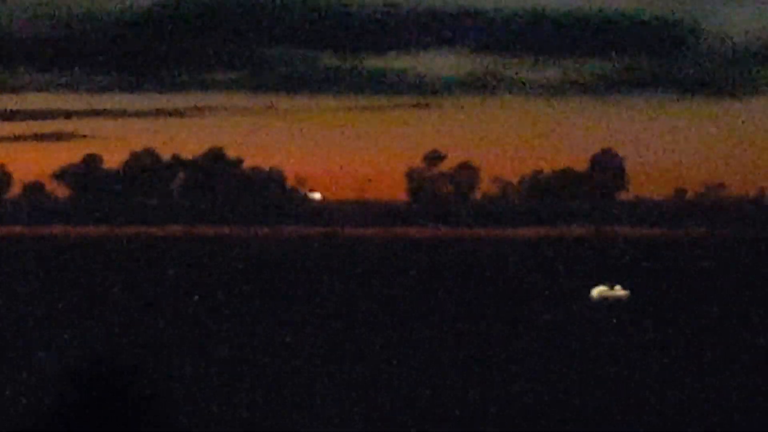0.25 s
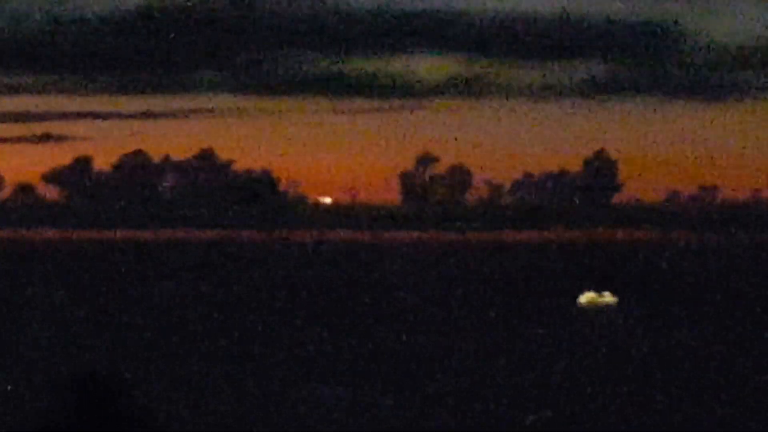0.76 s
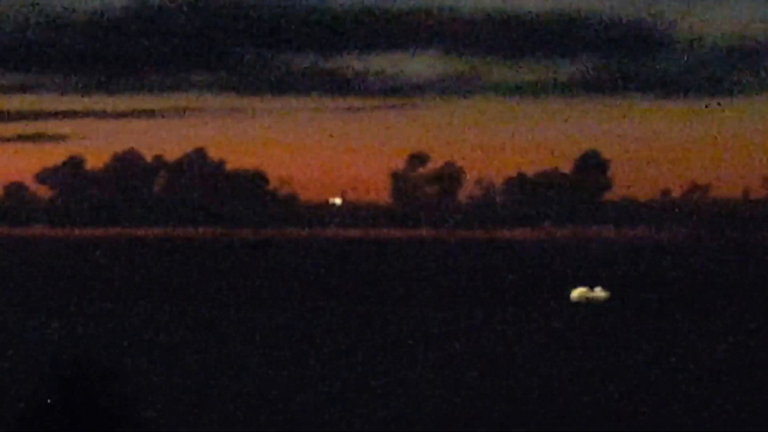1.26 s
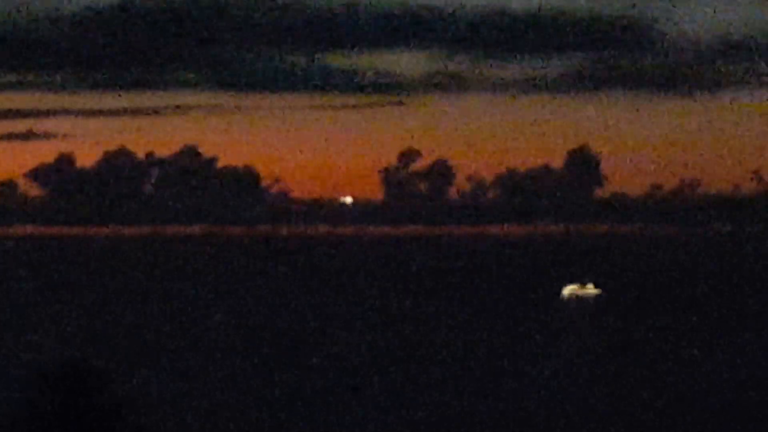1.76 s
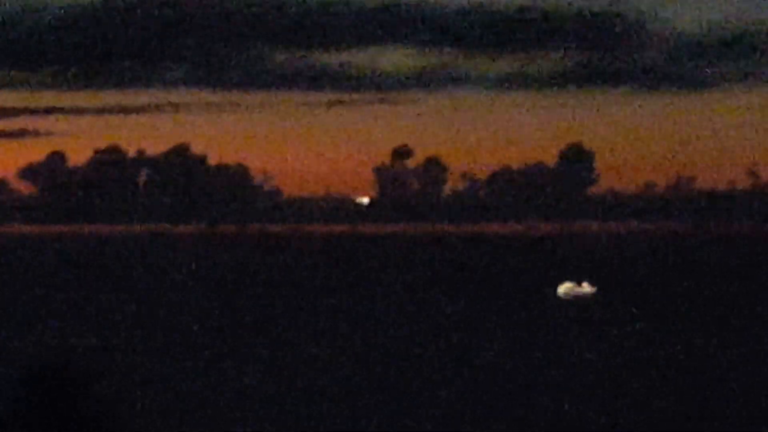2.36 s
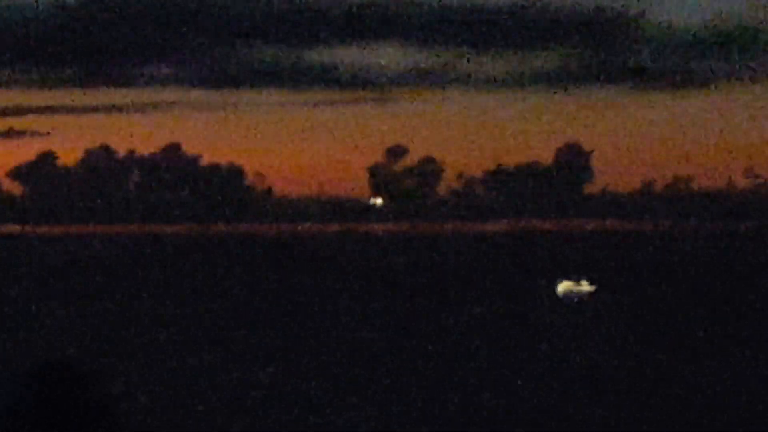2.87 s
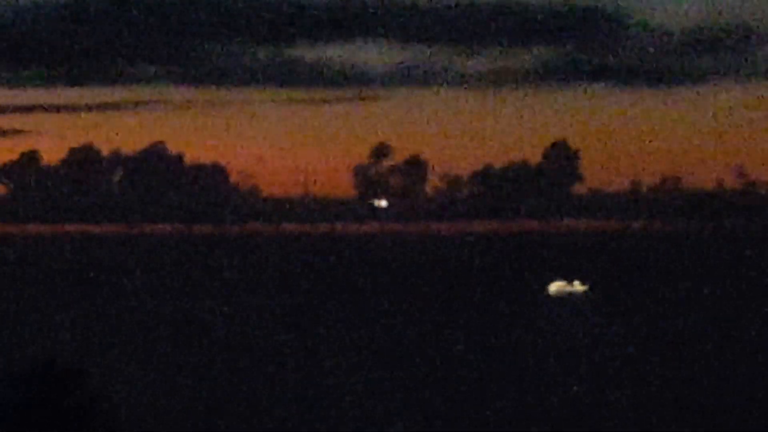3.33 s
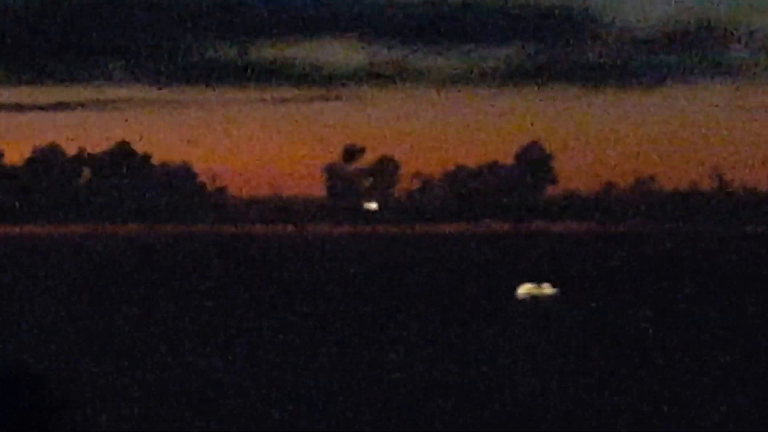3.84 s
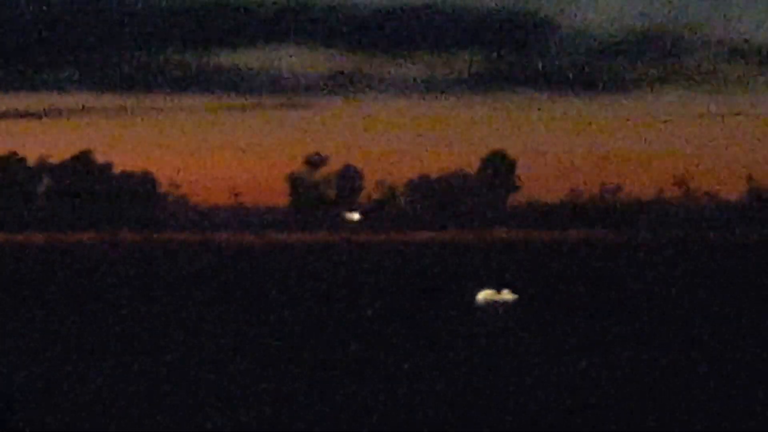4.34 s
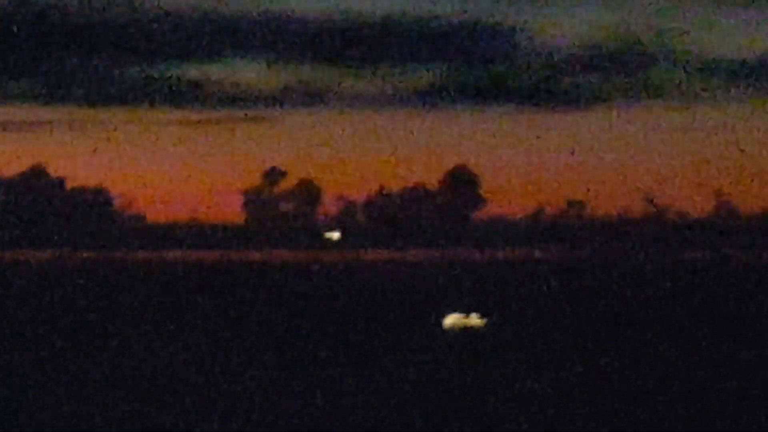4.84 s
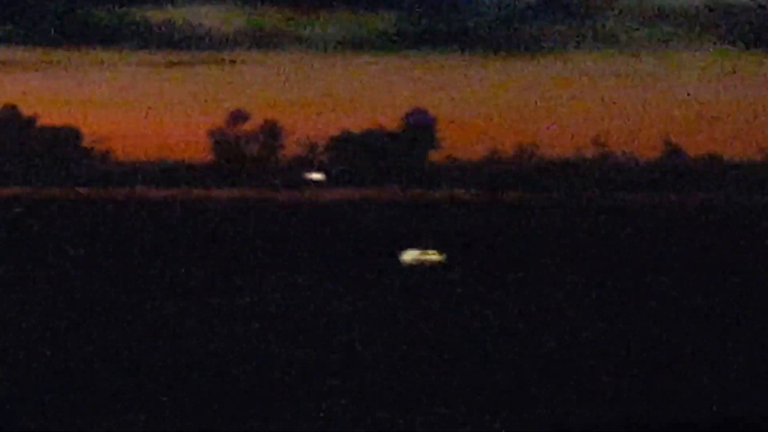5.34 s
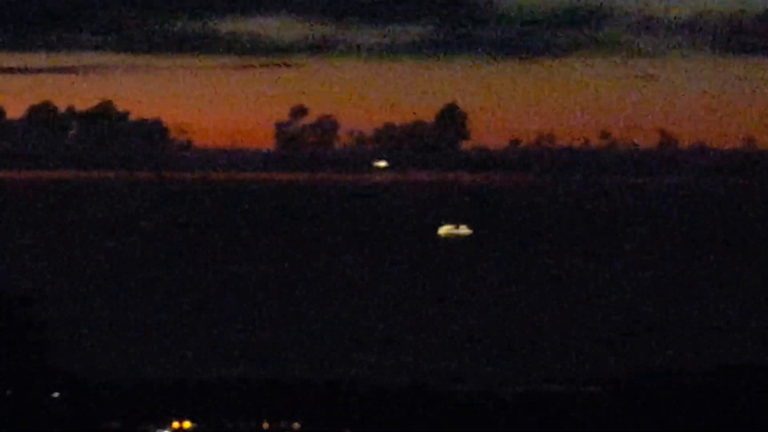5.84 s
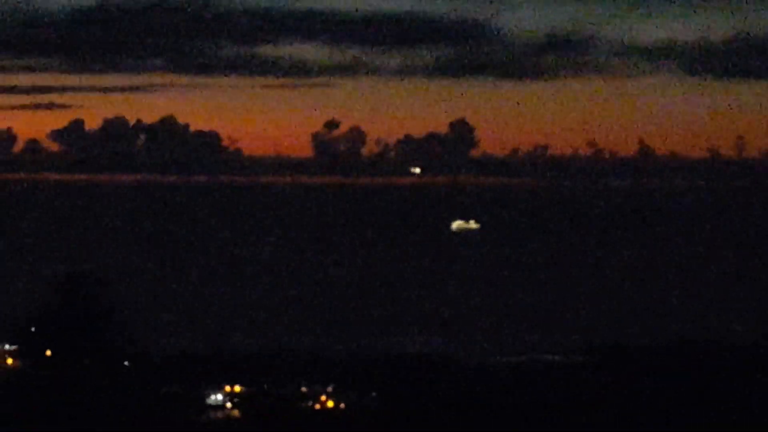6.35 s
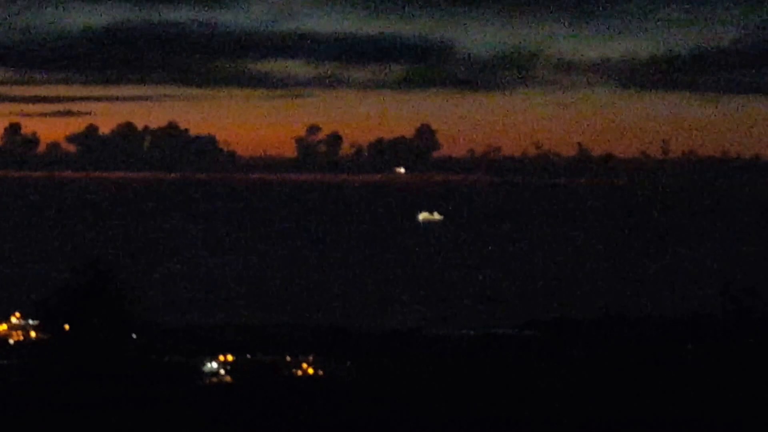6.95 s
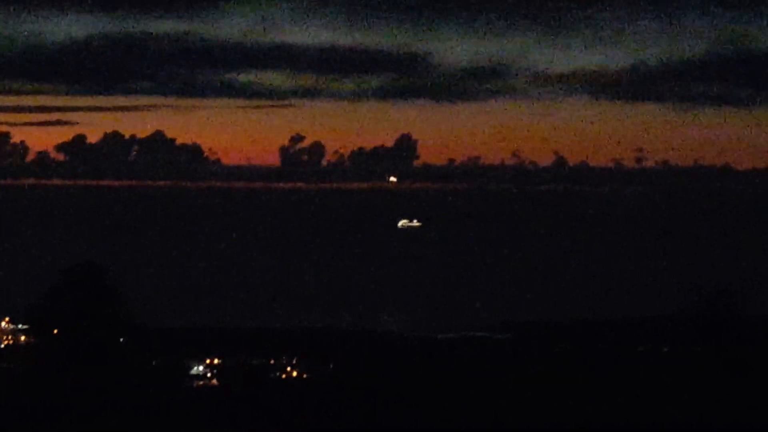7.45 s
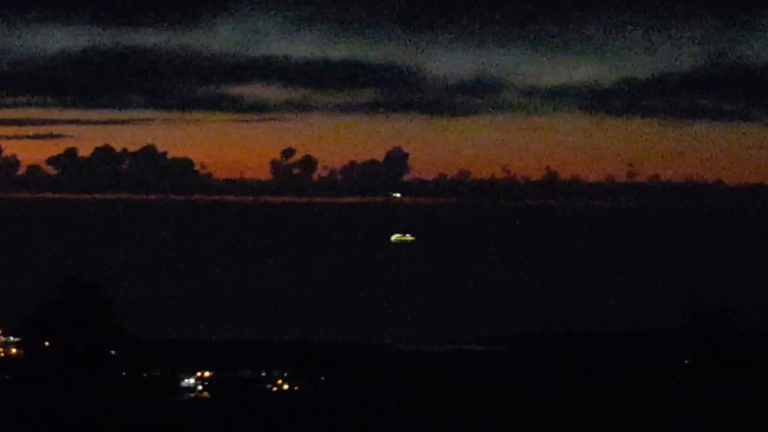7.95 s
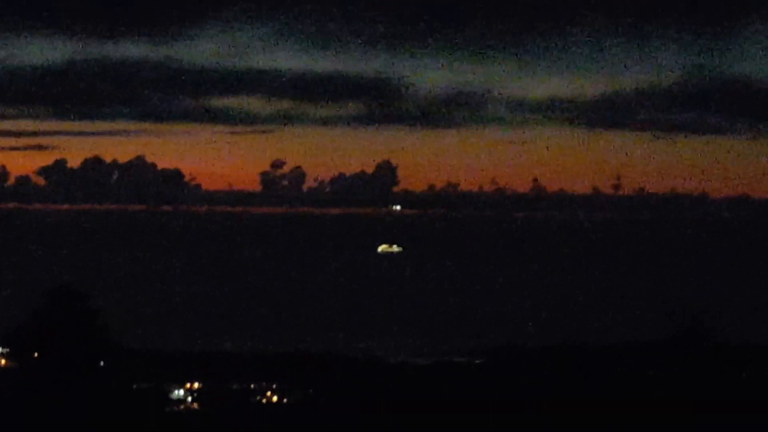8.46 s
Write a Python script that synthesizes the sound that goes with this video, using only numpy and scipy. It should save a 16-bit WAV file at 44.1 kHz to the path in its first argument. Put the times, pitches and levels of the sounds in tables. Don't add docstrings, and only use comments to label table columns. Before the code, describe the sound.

A close high frog chirp opens the scene, followed by loose rounds of low and rising notes roughly every two to three seconds. Fainter calls scatter through leafy surroundings with short garden echoes. A steady high insect whine and soft hiss continue throughout, over distant engine hum. A handheld stereo camera catches skin rubs early, a sharper bump in the middle and light taps later.

```python
import sys
import numpy as np
from scipy import signal
from scipy.io import wavfile
from scipy.ndimage import uniform_filter1d

SR = 44100
rng = np.random.default_rng(int(sys.argv[2]) if len(sys.argv) > 2 else 0)


def persist_wave(psi):
    counts = np.round(np.clip(psi, -1, 1) * 32767).astype(np.int16)
    wavfile.write(sys.argv[1], SR, np.atleast_2d(counts).T)


def voltage_ratio(decibels):
    exponent = np.asarray(decibels, float) / 20
    return 10 ** exponent


N = 383669

# pitch_hz, length_s, octave_db, left_right_db, droop_share
LOW_VOICES = [(1543, 0.11, -33, 8.5, 0.016), (1520, 0.11, -10, 1, -0.005), (1589, 0.097, -20.5, 5, 0.015)]
# start_hz, goal_hz, glide_s, left_right_db
HIGH_VOICES = [(2383, 2770, 0.063, 4), (2450, 2815, .028, 2), (2460, 2840, .042, 4.5)]
# start_s, level_db
LOW_CALLS = [
    [(.733, -36), (3.596, -35), (5.846, -38), (8.041, -35)],
    [(2.606, -40), (4.83, -37), (7.277, -37.5)],
    [(2.7, -44.5), (5.39, -43), (6.697, -43.5)],
]
# start_s, level_db, length_s, peak_after_s
HIGH_CALLS = [
    [(1.034, -31.5, 0.099, 0.066), (3.876, -31.5, 0.11, 0.064), (6.121, -38.5, 0.13, 0.08),
     (8.306, -40.5, 0.13, 0.075)],
    [(.067, -26.5, .11, 0.072), (2.84, -30, 0.11, 0.066), (5.078, -27, 0.099, 0.071),
     (7.534, -27.5, 0.11, 0.072)],
    [(.129, -34.5, 0.094, 0.043), (2.967, -40, 0.13, 0.049), (5.667, -42, 0.104, 0.049),
     (6.948, -33, 0.12, 0.056)],
]
# start_hz, goal_hz, glide_s, left_right_db
HOOK_VOICE = (1560, 1712, 0.028, 9.2)
# start_s, level_db, length_s
HOOK_CALLS = [
    (2.874, -47.5, 0.11),
    (5.067, -41, 0.12),
    (7.482, -39.5, .125),
]
# start_s, length_s, pitch_hz, level_db
BUSH_LOW_CALLS = [(0.244, 0.11, 1484, -54), (0.416, 0.037, 1560, -63), (.825, .09, 1830, -50.5),
                  (1.181, 0.094, 1508, -58), (1.297, 0.084, 1460, -57.5), (1.616, 0.074, 1630, -55.5),
                  (1.767, 0.12, 1500, -58), (1.863, 0.071, 1422, -51.5), (2.308, 0.13, 1600, -58),
                  (2.585, 0.16, 1578, -45.5), (3.043, 0.069, 1480, -51), (3.93, 0.097, 1500, -62),
                  (4.338, 0.078, 1628, -55), (4.332, 0.083, 1444, -57), (4.55, 0.11, 1523, -57.5),
                  (5.024, 0.042, 1395, -58.5), (5.323, 0.24, 1462, -62), (5.993, 0.054, 1620, -55),
                  (6.21, 0.067, 1464, -52), (6.226, 0.12, 1564, -55), (6.32, 0.14, 1492, -61),
                  (6.508, 0.083, 1408, -52), (7.238, .09, 1620, -51), (8.375, 0.14, 1469, -54.5),
                  (8.584, 0.091, 1565, -62)]
# start_s, goal_hz, glide_s, level_db, left_right_db
BUSH_HIGH_CALLS = [(.2, 2900, 0.053, -50, 8), (.496, 2734, 0.034, -47, 1), (.534, 2747, 0.044, -55, 1),
                   (.6, 2820, 0.048, -63, 3), (1.0, 2937, 0.066, -50, 0), (1.254, 2320, 0.028, -57.5, 6),
                   (1.425, 2900, 0.06, -54.5, 6), (1.443, 2690, 0.05, -54, 3),
                   (1.874, 3086, 0.064, -45.5, 7), (2.016, 2933, 0.071, -50, 9),
                   (2.382, 2956, 0.065, -52, -1), (2.572, 2965, 0.053, -51, 8),
                   (2.607, 2850, 0.058, -54, 0), (2.76, 2727, 0.051, -47.5, -2),
                   (3.238, 2870, 0.03, -49, 5), (3.294, 2900, 0.083, -46.5, -2), (3.8, 2950, 0.062, -55, 3),
                   (4.127, 2790, 0.081, -58, 1), (4.6, 3210, 0.1, -47, 7), (4.819, 2887, .05, -49.5, 11),
                   (5.0, 2850, 0.064, -63, 8), (5.234, 2310, 0.0282, -54.5, 8),
                   (5.335, 2950, 0.037, -57, 9), (5.591, 2830, 0.062, -48.5, 6), (6.464, 3116, .12, -49, 4),
                   (6.507, 2848, 0.048, -55, 5), (7.466, 3075, 0.052, -49, 5),
                   (7.49, 2887, 0.046, -43.5, 3), (7.56, 3075, 0.051, -56, 3), (7.82, 3107, .07, -59, 4),
                   (7.893, 2880, 0.1, -56.5, 9), (8.32, 3040, 0.043, -59, 8), (8.329, 2804, .081, -53, 3),
                   (8.62, 2856, 0.058, -49, 1)]
# note_s, delay_s, level_db,
# left_right_db
WALL_ECHOES = [(.067, 0.0091, -5.5, -1), (.129, 0.041, -11.5, 1), (.735, 0.039, -6, 5),
               (1.035, 0.029, -7, 4), (2.766, .029, -16, -3), (2.842, 0.032, 2, -7.5),
               (3.59, 0.044, -13, 0), (3.875, .025, -16, 6), (3.875, 0.062, -14.5, 2), (6.7, 0.043, -8, 2),
               (5.077, .06, -20.5, 3), (5.077, .012, -12, 3), (6.12, .03, -13, 6), (6.5, .03, 3, 6),
               (6.95, .012, -15, 8), (7.534, .015, -10, 1), (8.305, 0.035, -8, 5)]
# freq_hz, t60_s
GARDEN_T60 = [(1500, 0.42), (2500, 0.53)]
# time_s, level_db
CHORUS_LEVEL = [(0, -60.5), (.75, -51.5), (1.28, -58), (2.37, -59), (2.86, -51.5), (3.27, -55),
                (3.73, -60.5), (4.19, -55), (5.31, -59), (5.74, -48.5), (5.93, -61), (6.42, -55),
                (6.9, -59.5), (7.22, -56), (7.46, -62), (7.83, -57), (8.7, -62.5)]
# (freq_hz, width_hz, level_db)
KATYDID_VOICES = [
    ((2, 5, -52, -1.5), [(12850, 600, 0.5), (13900, 430, -1), (13960, 650, -5), (11440, 2100, -3), (15100, 350, -13), (15600, 300, -14)]),
    ((0.5, 4, -53.5, -3.5), [(9450, 610, 0.5), (10540, 1480, 3.5), (11460, 1270, 3.5), (12960, 490, 3.5), (14600, 650, -13)]),
    ((1.4, .7, -57.5, -13), [(10270, 720, -9.5), (10540, 1100, 3.5), (10930, 450, -0.5), (13100, 840, -5.5)]),
]
# from_s, to_s
KATYDID_SPANS = [
    (-1, 3.25),
    (-1, 9),
    (4.65, 9),
]
STROKE_RATES = [134.4, 127.1, 133.4]
# time_s, level_db
CRICKET_LEVEL = [
    (0.0, -62),
    (0.14, -61),
    (6.76, -63.5),
    (8.24, -61),
    (8.7, -65),
]
# start_s, length_s, level_db, brightest_hz, left_right_db
RUB_EVENTS = [(0.804, 0.15, -29.5, 2350, 2.5), (0.85, 0.45, -49, 1400, 5), (1.977, 0.097, -48, 4100, 6),
              (2.9, 0.033, -57.5, 5860, -4), (3.783, 0.079, -46, 800, 1), (4.033, 0.017, -39.5, 2480, 3),
              (4.638, 0.008, -33.5, 2440, -19), (5.188, 0.017, -38.5, 6500, 2.5),
              (5.875, 0.055, -38.5, 875, 4), (6.475, 0.072, -46, 2480, 10), (6.952, 0.14, -49.5, 4100, 12),
              (7.088, 0.22, -65, 2470, 33), (7.765, 0.03, -46, 1520, 12), (7.913, 0.036, -54, 900, 14),
              (8.222, 0.21, -48.5, 1820, 10.5), (8.32, 0.054, -40.5, 1620, 3.5)]
# start_s, peak_db, ring_hz, t60_s, tick_db
BUMP_KNOCKS = [
    (4.639, -24, 467, 0.015, -11.5),
    (4.644, -30.5, 167, 0.058, -40),
    (4.6497, -13, 366, 0.0072, -39.5),
    (4.657, -35.5, 386, 0.0057, 3.5),
]
# start_s, peak_db, ring_hz, t60_s, tick_db
TAP_KNOCKS = [
    (3.793, -35.5, 206, 0.032, -26),
    (5.878, -34, 187, 0.063, -24),
    (6.487, -35, 328, 0.016, -20),
    (7.904, -40.5, 400, 0.013, -10),
    (8.321, -44.5, 318, 0.12, -23),
]
# time_s, pitch_hz, level_db
ENGINE_TONES = [
    [(1.6, 170.7, -66), (1.9, 195.7, -45), (2.18, 189.4, -49), (4.6, 183.0, -57.5)],
    [(0.0, 161, -62), (0.08, 147.5, -53.5), (2.84, 165.1, -57), (3.2, 150, -45.5)],
    [(0.0, 286.7, -60.5), (0.966, 291, -61), (1.6, 298, -72)],
    [(0.0, 394, -63), (0.128, 378.2, -59), (1.6, 389.7, -69)],
]
# freq_hz, level_db
RUMBLE_SPECTRUM = [(25, -56.5), (43, -10.5), (113, -9.5), (188, -5), (240, -13.5), (541, -21.5),
                   (1300, -37), (2860, -69)]
# time_s, level_db
RUMBLE_LEVEL = [(0.0, -54.5), (0.31, -52.5), (1.67, -56), (2.08, -53.5), (2.47, -53.5), (4.82, -55),
                (7.56, -56), (8.19, -54), (8.7, -55.5)]
# freq_hz, level_db
AIR_SPECTRUM = [(800, -0.5), (2100, -3), (3300, -14.5), (5200, -9.5), (6300, -31), (9000, -4),
                (14500, -3.5), (15800, -19.5)]
# freq_hz, likeness
LIKENESS = [(60, 0.9), (130, 1), (290, 0.85), (640, 0.34), (1400, -0.63), (3000, 0.1)]
# freq_hz, level_db
QUIET_LIMIT = [(1500, -86), (3500, -97.5), (5000, -93.5), (6500, -99), (7500, -91), (8200, -90),
               (14800, -89.5), (15700, -96.5)]

ANIMAL_LAG, LOW_LAGS, HIGH_LAGS, HOOK_LAG = 18, (17, 19, 12), (16, 15, 18), 2
LOW_SCATTER_DB, BUSH_SCATTER_DB = -11, -6
SNAP_S, HIGH_S = .001, 0.13
NEAR_FLUTTER, HOOK_FLUTTER = .45, .15


def evened(x):
    return x / np.sqrt(np.mean(x ** 2) + 1e-20)


def read(points, hz):
    f, value = np.transpose(points)
    return np.interp(np.log(hz + 1), np.log(f + 1), value)


def curve(rows, column):
    rows = np.asarray(rows)
    return np.interp(np.arange(N) / SR, rows[:, 0], rows[:, column])


def drift(rate_hz):
    knots = rng.standard_normal(int(N / SR * 60) + 2)
    return evened(np.interp(np.arange(N) / SR * min(rate_hz, 59), np.arange(len(knots)), knots))


def add(mix, start_s, sound, pan_db, lag=0):
    for side, late, share in ((0, lag, .5), (1, 0, -.5)):
        part = mix[side, round(start_s * SR) + late:][:len(sound)]
        part += sound[:len(part)] * voltage_ratio(share * pan_db)


def flat_note(length_s, hz, octave_db, droop=0.0097):
    t = np.arange(0, length_s + 0.0049, 1 / SR)
    pitch_hz = hz * (1 - 0.033 * np.exp(-t / 0.0085) - droop * (t / length_s) ** 2)
    turn = 2 * np.pi * np.cumsum(pitch_hz) / SR
    attack = 1 - np.exp(-(t / 0.0079) ** 3.4)
    release = np.clip((length_s + 0.008 - t) / 0.0088, 0, 1)
    shape = attack * voltage_ratio(-14 * t) * release
    overtones = np.sin(2 * turn) + voltage_ratio(-25) * np.sin(3 * turn)
    return np.sqrt(2) * shape * (np.sin(turn) + voltage_ratio(octave_db + 100 * (t - 0.03)) * overtones)


def rising_note(start_hz, goal_hz, glide_s, climb_hz_per_s=790, attack_s=SNAP_S, length_s=HIGH_S,
                swell_s=.024, peak_s=.07, flutter=1):
    t = np.arange(0, length_s, 1 / SR)
    tremble, wobble = (np.interp(t, np.arange(30) * .006, knots)
                       for knots in flutter * rng.standard_normal((2, 30)))
    bend_hz = goal_hz - start_hz
    hz = goal_hz - bend_hz * np.exp(-t / glide_s) + climb_hz_per_s * (t - .07) + 14 * wobble
    if glide_s < .045 and attack_s == SNAP_S:
        hz -= .6 * bend_hz * np.exp(-t / .0012)
    shape = 1 - .62 + .62 * np.exp(-((t - peak_s) / swell_s) ** 2)
    tremble_gain = voltage_ratio(2.5 * tremble * (1 - shape))
    shape *= np.clip(t / attack_s, 0, 1) * np.clip((length_s - t) / 0.019, 0, 1)
    return np.sqrt(2) * shape * tremble_gain * np.sin(2 * np.pi * np.cumsum(hz) / SR)


def dipped(start_s, note):
    t = start_s + np.arange(len(note)) / SR
    return note * np.prod([np.tanh((t - at_s) / .009) for at_s in (.79, 3.667)], axis=0)


def frog_notes():
    notes = []
    for (hz, length_s, octave_db, pan_db, droop), lag, calls in zip(LOW_VOICES, LOW_LAGS, LOW_CALLS):
        for s, db in calls:
            note = dipped(s, flat_note(length_s, hz, octave_db, droop))
            notes.append((s, db, pan_db, lag, LOW_SCATTER_DB, note))
    for (*bend, pan_db), lag, calls in zip(HIGH_VOICES, HIGH_LAGS, HIGH_CALLS):
        for s, db, length_s, peak_s in calls:
            note = rising_note(*bend, length_s=length_s, peak_s=peak_s, flutter=NEAR_FLUTTER)
            notes.append((s, db, pan_db, lag, 0, note))
    *bend, pan_db = HOOK_VOICE
    for s, db, length_s in HOOK_CALLS:
        note = rising_note(*bend, climb_hz_per_s=-500, attack_s=0.0062, length_s=length_s,
                           swell_s=0.056, flutter=HOOK_FLUTTER)
        notes.append((s, db, pan_db, HOOK_LAG, LOW_SCATTER_DB, note))
    for s, length_s, hz, db in BUSH_LOW_CALLS:
        notes.append((s, db, 9.5, ANIMAL_LAG, BUSH_SCATTER_DB, flat_note(length_s, hz, -21)))
    for s, hz, glide_s, db, pan_db in BUSH_HIGH_CALLS:
        start_hz = hz - 317.4 - 3000 * glide_s
        notes.append((s, db, pan_db, ANIMAL_LAG, 0, rising_note(start_hz, hz, glide_s)))
    return notes


def garden(x, gap_s, stretch):
    t = np.arange(SR // 2) / SR
    hits = rng.random((2, SR // 2)) < .03
    taps = rng.standard_normal((2, SR // 2)) * hits * (t > gap_s)
    hz, s, z = signal.stft(taps, SR, nperseg=256)
    decay = voltage_ratio(-60 * s / (stretch * read(GARDEN_T60, hz)[:, None]))
    tail = signal.istft(z * decay, SR, nperseg=256)[1]
    return signal.fftconvolve(x, tail / np.linalg.norm(tail[0]), axes=1)[:, :N]


def near_frogs():
    notes = frog_notes()
    for note_s, delay_s, echo_db, echo_pan_db in WALL_ECHOES:
        s, db, _, lag, scatter_db, note = min(notes, key=lambda row: abs(row[0] - note_s))
        notes.append((s + delay_s, db + echo_db, echo_pan_db, lag, scatter_db, note))
    direct, scattered = np.zeros((2, 2, N))
    for s, db, pan_db, lag, scatter_db, note in notes:
        depth_db = 0.29 * (-31.5 - db)
        add(direct, s, voltage_ratio(db - 0.12 * depth_db) * note, pan_db, lag)
        add(scattered, s, voltage_ratio(db + 0.97 * depth_db + scatter_db) * note, .5 * pan_db)
    leaves = voltage_ratio(-4.5) * garden(scattered, gap_s=.004, stretch=.3)
    walls = voltage_ratio(-12.5) * garden(scattered, gap_s=0.031, stretch=0.67)
    return direct + leaves + walls


def far_frogs(count=380):
    low, high = np.zeros((2, 2, N + SR))
    for when, size, loud, side, glide in rng.random((count, 5)):
        s, db, pan_db = when * (N / SR + .5), -9 * loud, 8 * side - 3
        low_note = flat_note(.1, 1420 + 200 * size, -11.5)
        high_note = rising_note(2250 + 250 * size, 2620 + 340 * size, 0.05025 + 0.0588 * glide, 899)
        add(low, s, voltage_ratio(db) * low_note, pan_db)
        add(high, s + .25, voltage_ratio(db) * high_note, pan_db)
    heard = 0
    for notes, level_db, wet_db in [(high, curve(CHORUS_LEVEL, 1), 5), (low, -61, 10)]:
        notes = notes[:, SR // 2:][:, :N]
        wet = notes + voltage_ratio(wet_db) * garden(notes, gap_s=.003, stretch=.85)
        wet /= np.sqrt(uniform_filter1d((wet ** 2).mean(0), size=14000))
        heard = heard + voltage_ratio(level_db) * wet
    return heard


def resonate(x, hz, width_hz):
    r = np.exp(-np.pi * width_hz / SR)
    a = [1, -2 * r * np.cos(2 * np.pi * hz / SR), r * r]
    b = np.array([1, 0, -1]) * (1 - r * r) / 2
    return signal.lfilter(b, a, signal.lfilter(b, a, x))


def katydid(span_s, rate_hz, song, wing):
    share, repeated, db, pan_db = song
    t = np.arange(N) / SR
    turns = np.cumsum(rate_hz * (1 + 0.001 * drift(2) + .0016 * drift(40))) / SR
    stroke = turns % 1
    burst = np.exp(-((stroke - .5) / (share / 2)) ** 2) + 0.54
    teeth = burst * np.interp(stroke, np.linspace(0, 1, num=300), rng.standard_normal(300))
    teeth = evened(np.array([np.roll(teeth, ANIMAL_LAG), teeth]))
    repeated = np.clip(repeated, .6, .66)
    scrape = evened(burst) * rng.standard_normal((2, N))
    drive = repeated * teeth + np.sqrt(1 - repeated ** 2) * scrape
    ring = evened(sum(voltage_ratio(mode_db) * evened(resonate(drive, hz, width_hz))
                      for hz, width_hz, mode_db in wing))
    singing = np.clip(np.minimum(t - span_s[0], span_s[1] - t) / 0.013, 0, 1)
    return voltage_ratio(db + np.array([[.5], [-.5]]) * pan_db + 0.14 * drift(16)) * singing * ring


def crickets(count=18):
    t, mix = np.arange(N) / SR, np.zeros((2, N))
    for pitch, pace, side, lag in rng.random((count, 4)):
        turn = 2 * np.pi * np.cumsum(5500 + 340 * pitch + 50 * drift(55)) / SR
        turn = (turn % (2 * np.pi)).astype(np.float32)
        beat = (2 * np.pi * (20 + 60 * pace) * t + 6 * lag).astype(np.float32)
        pan = voltage_ratio(np.array([[2 * side + 0.46], [-2 * side - .4]]))
        mix += (2.5 + np.sin(beat)) * np.sin(turn + np.float32([[0], [6 * lag]])) * pan
    return voltage_ratio(curve(CRICKET_LEVEL, 1) + 2.5 + 2.16 * drift(18)) * evened(mix)


def rubs():
    mix = np.zeros((2, N))
    soften = signal.butter(2, 7000, fs=SR)
    for s, length_s, db, bright_hz, pan_db in RUB_EVENTS:
        t = np.arange(0, 2 * length_s, 1 / SR)
        shape = np.clip(t / (0.17 * length_s), 0, 1) * voltage_ratio(-16 * (t / length_s) ** 1.02)
        band = signal.butter(1, [0.18 * bright_hz, min(0.77 * bright_hz, 9000)], "bandpass", fs=SR)
        for side_db in (30, -30):
            grain = rng.standard_normal(len(t))
            grain *= voltage_ratio(60 * uniform_filter1d(rng.standard_normal(len(t)), size=150))
            soft = signal.lfilter(*soften, signal.lfilter(*band, grain))
            add(mix, s, voltage_ratio(db - 22.0) * shape * evened(soft), pan_db + side_db)
    return mix


def knocks():
    mix = np.zeros((2, N))
    t = np.arange(3000) / SR
    for rows, pan_db in ((BUMP_KNOCKS, -12.5), (TAP_KNOCKS, -1)):
        for s, db, ring_hz, t60_s, tick_db in rows:
            ring = np.sin(2 * np.pi * ring_hz * t * (1 - 8 * t))
            thud = (1 - np.exp(-t / 0.00062)) * voltage_ratio(-60 * t / t60_s) * ring
            tick = voltage_ratio(tick_db) * np.exp(-t / 0.00018) * rng.standard_normal(len(t))
            add(mix, s, voltage_ratio(db) * (thud + tick), pan_db)
    return mix


def engines():
    t, mix = np.arange(N) / SR, 0
    for rows in ENGINE_TONES:
        fade = np.clip(np.minimum(t - rows[0][0] + 0.46, rows[-1][0] - t) / 0.13, 0, 1)
        turn = 2 * np.pi * np.cumsum(curve(rows, 1) + 1.38 * drift(8)) / SR
        level = voltage_ratio(curve(rows, 2) - 5.5 + 0.98 * drift(16.0))
        mix = mix + np.sqrt(2) * fade * level * np.sin(turn)
    return mix


def noise(spectrum, patchy_db):
    hz = np.fft.rfftfreq(2048, 1 / SR)
    a, b, c, d, patches = rng.standard_normal((N // 512 + 5, 1025, 5)).T
    patches = uniform_filter1d(patches, size=9, axis=0)
    patches = evened(uniform_filter1d(patches, size=7, axis=1))
    same = np.clip(read(LIKENESS, hz), -1, 1)[:, None]
    left = a + 1j * b
    right = same * left + np.sqrt(1 - same ** 2) * (c + 1j * d)
    z = np.array([left, right]) * voltage_ratio(read(spectrum, hz)[:, None] + patchy_db * patches)
    return evened(signal.istft(z, nperseg=2048, noverlap=1536)[1][:, :N])


def background():
    rumble = voltage_ratio(curve(RUMBLE_LEVEL, 1) + 0.9) * noise(RUMBLE_SPECTRUM, patchy_db=1.5)
    return rumble + voltage_ratio(-58) * noise(AIR_SPECTRUM, patchy_db=-2.0)


def scene():
    frogs = near_frogs() + far_frogs()
    katydids = sum(katydid(span_s, rate_hz, *voice)
                   for span_s, rate_hz, voice in zip(KATYDID_SPANS, STROKE_RATES, KATYDID_VOICES))
    return frogs + katydids + crickets() + rubs() + knocks() + engines() + background()


def masked(x, under_db, up_db, down_db, waver_db):
    window = np.sqrt(np.hanning(2048))
    hz, _, z = signal.stft(x, SR, window, nperseg=2048, noverlap=1024)
    power = (abs(z[:, :1024]) ** 2).mean(0).reshape(128, 8, -1).mean(1)
    level_db = 10 * np.log10(power + 1e-20)
    band = np.arange(128)[:, None]
    above_db = np.maximum.accumulate(level_db + up_db * band, axis=0) - up_db * band
    below_db = np.maximum.accumulate((level_db - down_db * band)[::-1], axis=0)[::-1] + down_db * band
    shadow_db = np.maximum(above_db, below_db) - under_db
    limit_db = np.maximum(shadow_db, read(QUIET_LIMIT, hz[4:1024:8])[:, None])
    kept = level_db > limit_db + waver_db * rng.standard_normal(level_db.shape)
    kept[:9] = True
    z[:, :1024] *= np.repeat(kept, 8, axis=0)
    return signal.istft(z, SR, window, nperseg=2048, noverlap=1024)[1][:, :N]


def low_pass(x):
    return signal.sosfilt(signal.butter(12, 15730, fs=SR, output="sos"), x)


def record(dry):
    heard = signal.lfilter(*signal.butter(3, 50, "highpass", fs=SR), dry)
    mix = masked(heard, under_db=22.0, up_db=3.0, down_db=7.5, waver_db=2.5) - .0006
    return low_pass(mix)


dry = scene()
out = record(dry)
persist_wave(out)
```